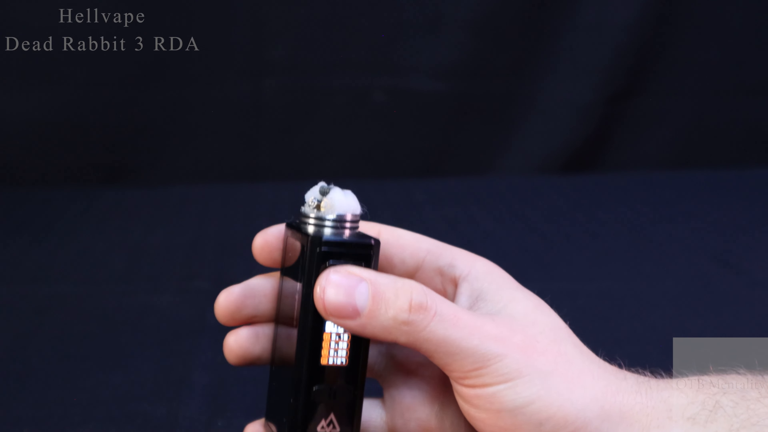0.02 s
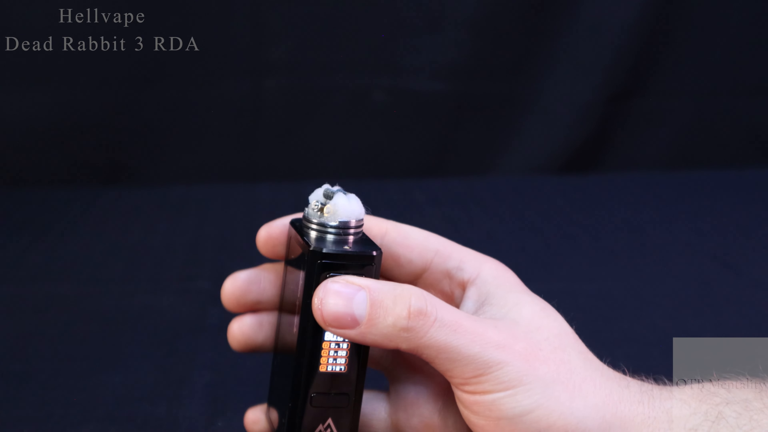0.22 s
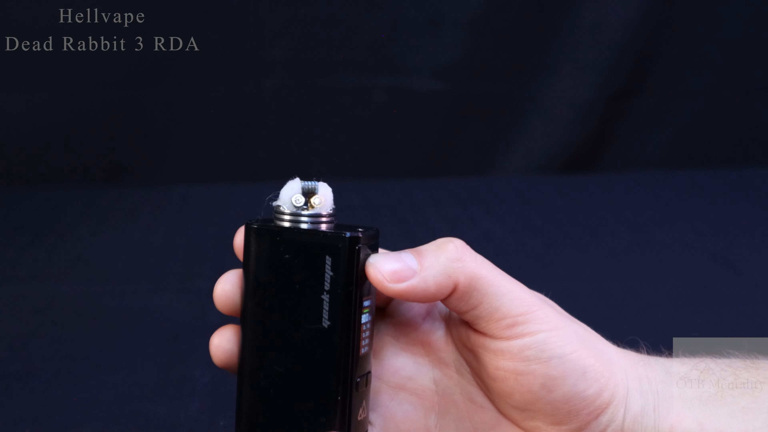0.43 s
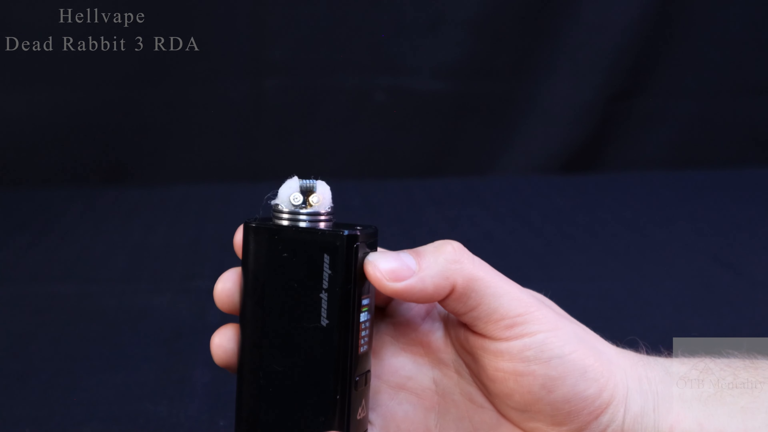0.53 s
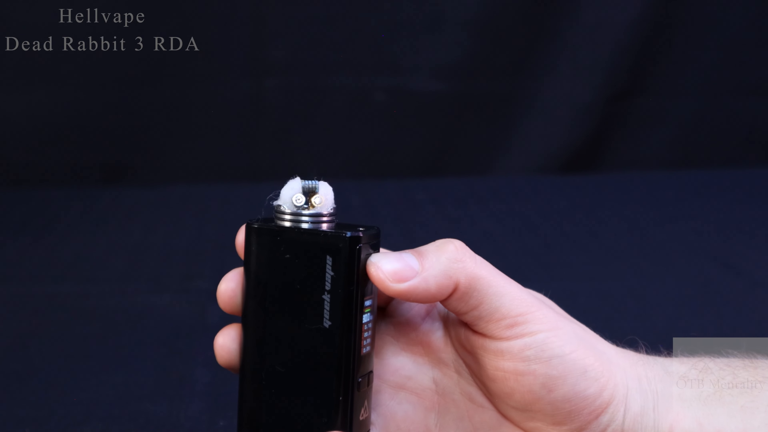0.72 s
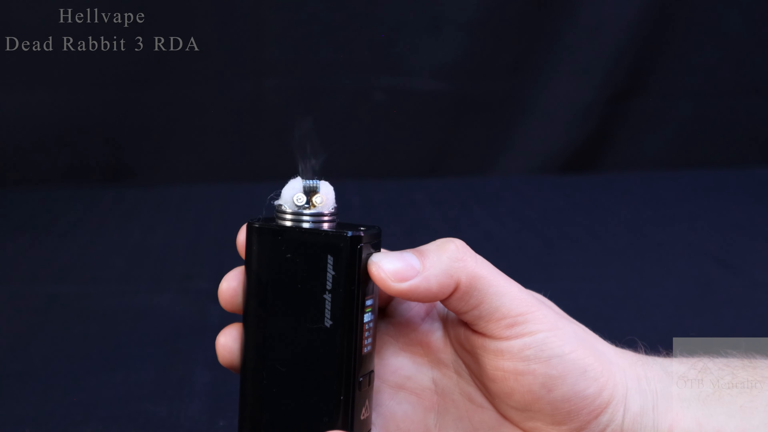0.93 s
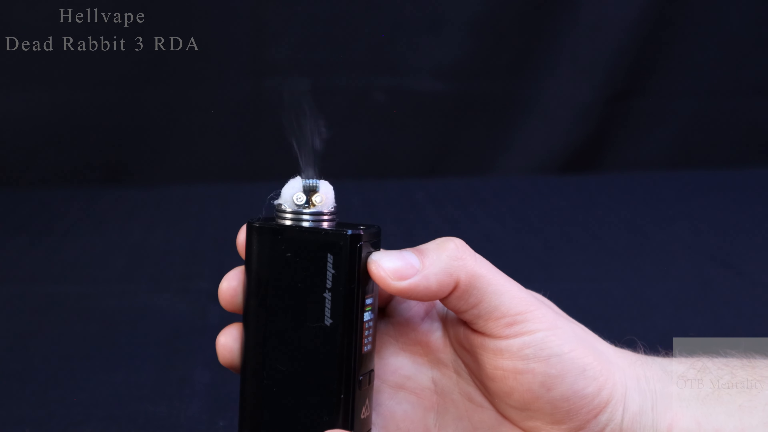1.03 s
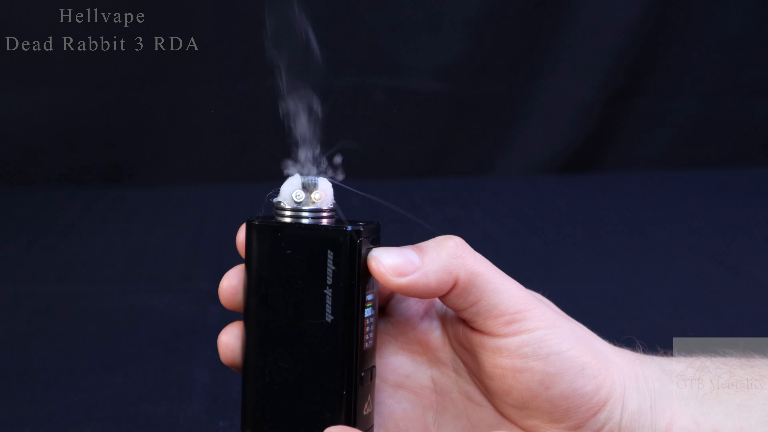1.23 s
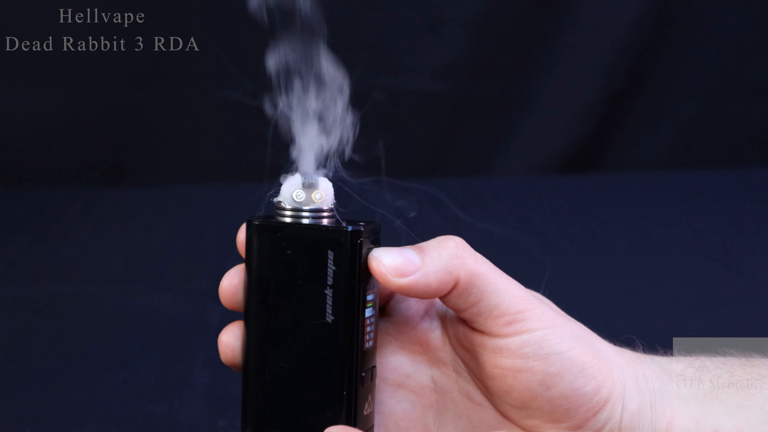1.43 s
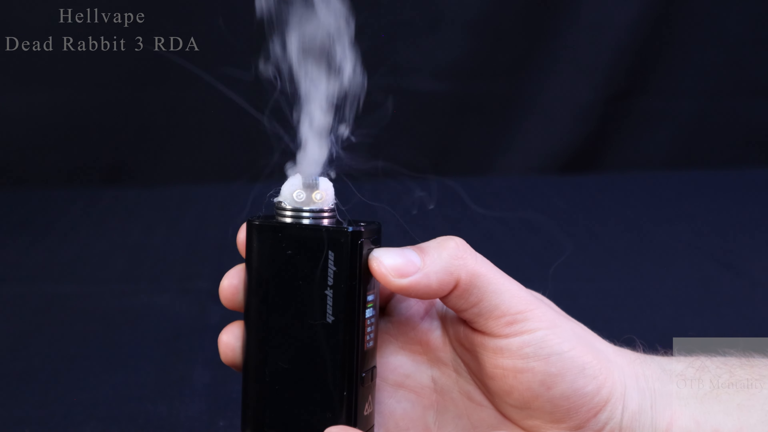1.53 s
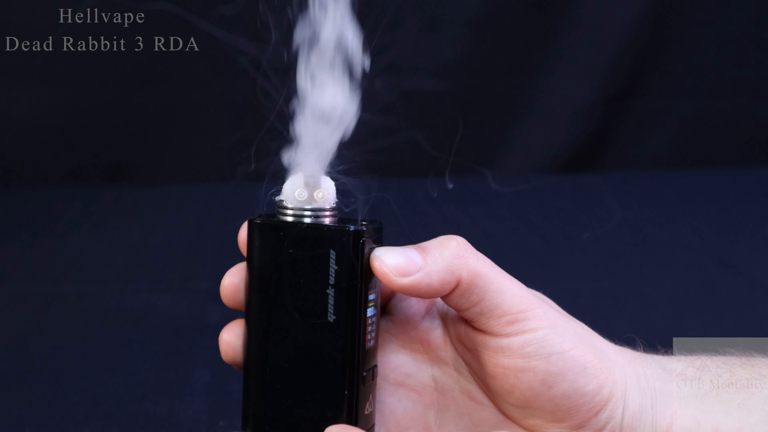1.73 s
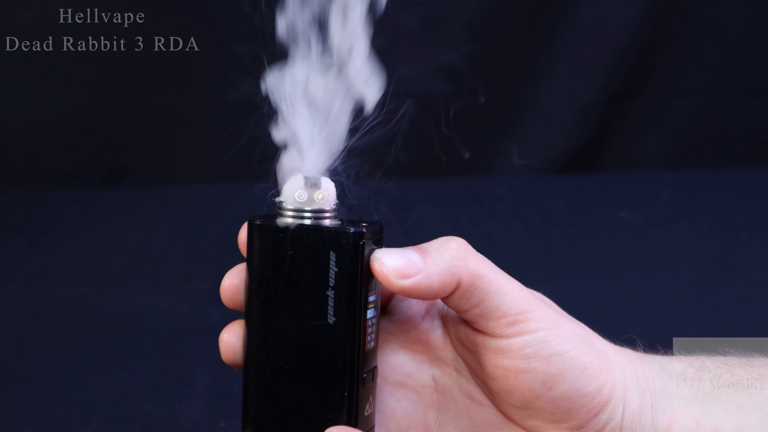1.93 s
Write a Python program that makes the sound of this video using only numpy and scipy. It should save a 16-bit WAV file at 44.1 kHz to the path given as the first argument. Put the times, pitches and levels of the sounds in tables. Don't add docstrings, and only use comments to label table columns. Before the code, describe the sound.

Wet coils in a vaping device begin to sizzle faintly after a soft button click, spit around the middle, then boil into a steady hiss; low handling bumps come first, close up in a quiet room.

```python
import sys
import numpy as np
from scipy import signal
from scipy.fft import rfft, irfft
from scipy.io import wavfile
from scipy.ndimage import uniform_filter1d

SR = 44100
rng = np.random.default_rng(int(sys.argv[2]) if len(sys.argv) > 2 else 0)


def volts_from_db(level):
    exponent = np.asarray(level, float) / 20
    return 10 ** exponent


def to_wav(sig):
    pcm = np.clip(np.atleast_2d(sig), -1, 1) * 32767
    pcm = np.round(pcm).astype(np.int16)
    wavfile.write(sys.argv[1], SR, pcm.T)


N = 88200
T = np.arange(N) / SR


def level(x, db):
    return x * volts_from_db(db) / np.sqrt(np.mean(x ** 2))


def curve(rows, before_db=-130):
    a = np.array(rows)
    return np.interp(T, a[:, 0], a[:, 1], left=before_db)


def ring(x, hz, width_hz):
    return signal.lfilter(*signal.iirpeak(hz, hz / width_hz, fs=SR), x)


def noise(points):
    a = np.array(points)
    f = np.fft.rfftfreq(N, 1 / SR) + 1
    colour_db = np.interp(np.log(f), np.log(a[:, 0]), a[:, 1])
    return level(irfft(rfft(rng.standard_normal(N)) * volts_from_db(colour_db), N), 0)


def walk(rate_per_s):
    k = int(SR / rate_per_s)
    return level(uniform_filter1d(uniform_filter1d(rng.standard_normal(N), k), k), 0)


# t/s, level/dB
SPIT_EVENTS = [(.9543, -52), (.9618, -52), (.9678, -52), (.981, -52), (.985, -53), (.9914, -52),
               (.9954, -49), (.9985, -49), (1.0125, -46), (1.0175, -50), (1.023, -51), (1.0257, -50),
               (1.032, -54), (1.0595, -53), (1.08, -53), (1.0875, -53), (1.2326, -52), (1.3174, -48)]
FULL_BOIL_DB = -54


def bubbles(heat_db):
    pops_per_s, spread_db = 2500, 5.5
    chance, sign, size = rng.random((3, N))
    pops = (chance < pops_per_s / SR) * np.sign(sign - .5) * volts_from_db(-spread_db * np.log(size + 1e-4))

    spitting = np.exp(-((T - 1.03) / .12) ** 2)
    pop_share = volts_from_db(-9 + 3 * spitting)
    drive = (rng.standard_normal(N) + level(pops, 0) * pop_share) / np.sqrt(1 + pop_share ** 2)
    for s, db in SPIT_EVENTS:
        i = int(s * SR)
        drive[i] -= volts_from_db(db - FULL_BOIL_DB - heat_db[i]) * 3
    return drive


# f/Hz, width/Hz, level/dB at full boil, growth/(dB per dB of boiling), wake t/s
DECK_MODES = [(442, 510, -15.5, 1.4, 1.37), (1240, 1140, -15.5, 3, 1.17), (2030, 1280, -7, 2, 1.28),
              (3794, 1100, -7.5, 2, 0.92), (5855, 1870, -6, 1.77, 0.89), (7880, 1500, -0.5, 1.7, 0.35),
              (9600, 2800, -3, 1.4, 0.41), (12470, 3000, -6, 1.12, 0.54), (14930, 7300, -7.5, 1, 0.75)]


def deck(drive, heat_db):
    wake_span_s, asleep_db = 0.079, -5
    flicker_db, flicker_per_s = .5, 22
    out = np.zeros(N)
    for k, (hz, width_hz, db, growth, wake_s) in enumerate(DECK_MODES):
        mode = level(ring(ring(drive, hz, width_hz), hz, width_hz), db)
        asleep = np.clip((wake_s - T) / wake_span_s, 0, 1)
        gain_db = growth * heat_db + flicker_db * walk(flicker_per_s) + asleep_db * asleep
        out += (-1) ** k * mode * volts_from_db(gain_db)
    return out


# t/s, level/dB
BOIL = [
    (0.49, -77),
    (0.544, -67),
    (0.85, -63),
    (1.018, -57.5),
    (1.04, -59),
    (1.452, -54),
    (1.994, -51.5),
    (2.0, -54.5),
]
# delay t/s, level/dB
SURFACES = [(.00603, -14), (.0031, -19), (.0107, -21.5), (0.0166, -17), (0.0228, -18.5), (.0331, -21),
            (.047, -17)]


def sizzle():
    heat_db = curve(BOIL) - FULL_BOIL_DB
    direct = deck(bubbles(heat_db), heat_db)
    out = direct.copy()
    for delay_s, db in SURFACES:
        out += volts_from_db(db) * np.roll(direct, int(delay_s * SR)) * (T > delay_s)
    return out * volts_from_db(FULL_BOIL_DB - 2.5)


# t/s, level/dB
GRIP_LEVEL = [(0, -51), (.04, -48), (.1, -52.5), (.26, -43.5), (.35, -47.5), (.385, -70), (.48, -57),
              (.52, -53.5), (.64, -70)]


def grip():
    fade_db = -280 * np.maximum(T - .64, 0)
    rumble = noise([(25, -14), (60, 3), (100, 5.5), (170, -7.5), (230, -29.5)])
    return rumble * volts_from_db(curve(GRIP_LEVEL) + fade_db)


# t/s, peak level/dB, f/Hz, rise/s, fall/s
BLOWS = [(0.045, -24.5, 75.2, 0.0064, .012), (0.068, -36.5, 37.7, 0.016, 0.069),
         (0.137, -45, 86, .01, 0.0079), (0.184, -21.5, 105.5, 0.0075, 0.006),
         (.2035, -10, 64, 0.0075, 0.024), (.285, -33.5, 88, 0.015, 0.012), (0.314, -38, 88.8, 0.016, 0.015),
         (0.481, -33, 84.5, 0.01, 0.0088), (.51, -45, 86, 0.028, 0.036), (.54, -47, 129.3, 0.0047, 0.043),
         (0.584, -58, 99, 0.0078, 0.0064)]


def thumps():
    hand_damps_s, damp_span_s, stand_top_hz = .266, 0.0089, 213
    out = np.zeros(N)
    for s, db, hz, rise_s, fall_s in BLOWS:
        u = np.maximum(T - s, 0)
        rise = np.sin(np.pi / 2 * np.minimum(u / rise_s, 1)) ** 2
        fall = np.exp(-np.maximum(u - rise_s, 0) / fall_s)
        stop = np.clip((hand_damps_s - T) / damp_span_s, 0, 1) if s < hand_damps_s else 1
        out -= volts_from_db(db) * rise * fall * stop * np.sin(2 * np.pi * hz * u)
    lowpass = signal.butter(6, stand_top_hz, fs=SR, output="sos")
    return signal.sosfiltfilt(lowpass, out + grip())


def creak():
    start_hz, glide_hz_per_s, span_s = 373, 3200, 0.012
    u = T - .226
    chirp = np.sin(2 * np.pi * u * (start_hz + glide_hz_per_s / 2 * u))
    rough = 1 + .8 * np.cos(2 * np.pi * 140 * T) + .5 * walk(60)
    return np.exp(-(u / span_s) ** 2) * chirp * rough * volts_from_db(-60)


# f/Hz, level/dB, t60/s
BUTTON_MODES = [(484, -12, 0.0057), (726, -8, 0.0089), (1010, -5.5, .025), (1326, -1, 0.015),
                (1860, -5, 0.011), (2270, -9, 0.018), (2620, -10, 0.013), (3400, -0.5, 0.0097),
                (3600, -11, 0.014), (4550, -17, 0.024), (5300, -17, .01), (6700, -17, 0.008),
                (8400, -16, .004)]


def button():
    click_s, click_db = .4745, -43.5
    echo_s, echo_db = 0.0068, -20
    tail_db, tail_t60_s = -57, .26
    click = np.zeros(N)
    for s, gain in ((click_s, 1), (click_s + echo_s, volts_from_db(echo_db))):
        u = np.maximum(T - s, 0)
        for hz, db, t60_s in BUTTON_MODES:
            click += gain * volts_from_db(db - 60 * u / t60_s) * np.sin(2 * np.pi * hz * u)

    u = np.maximum(T - click_s, 0)
    tail = noise([(200, -6), (900, -7.5), (2000, -10), (2900, -25), (3800, -11.5), (6000, -31)])
    tail *= (u > 0) * volts_from_db(tail_db - 60 * u / tail_t60_s)
    return click * volts_from_db(click_db) + tail


# t/s, level/dB
RUSTLE_LEVEL = [(0, -64.5), (.06, -67), (.125, -65), (.2, -68), (.27, -71), (.34, -75.5), (.42, -88)]
# f/Hz, level/dB
CLOTH_COLOUR = [(300, -3), (600, -8.5), (1100, -7.5), (2300, -7), (3200, -13), (4000, -12.5), (5500, -20),
                (12000, -24.5)]


def cloth():
    fade_db = -240 * np.maximum(T - .42, 0)
    rub = noise([(150, -31)] + list(CLOTH_COLOUR) + [(16000, -41)])
    return rub * volts_from_db(curve(RUSTLE_LEVEL) + fade_db + 2.0 * walk(40))


# t/s, level/dB
SWAY_LEVEL = [(0.4, -66), (0.452, -54), (0.746, -53), (0.908, -76), (1.076, -52), (1.224, -59.5),
              (1.366, -44.5), (1.834, -49), (2.0, -55.5)]


def sway():
    hz = 16.5 * (1 + .03 * walk(2.6))
    return np.sqrt(2) * np.sin(2 * np.pi * np.cumsum(hz) / SR) * volts_from_db(curve(SWAY_LEVEL, -54))


# f/Hz, level/dB
ROOM_COLOUR = [(12, -19), (22, -2), (45, -8.5), (90, -13.5), (150, -19), (240, -28), (1100, -38),
               (6000, -52.5)]


def room():
    swell_db = .8 * walk(8)
    tone = noise(list(ROOM_COLOUR) + [(9000, -68.5)]) * volts_from_db(-58 + swell_db)
    hiss = volts_from_db(-74) * rng.standard_normal(N)
    return tone + hiss


def scene():
    return (sizzle() + thumps() + creak() + button() + cloth() + sway() + room())[None]


def band_limit(x):
    return signal.sosfilt(signal.butter(12, 16320, fs=SR, output="sos"), x)


def record(dry):
    top_hz, slope_hz = 15770, 30
    f = np.fft.rfftfreq(N, 1 / SR)
    mix = irfft(rfft(dry) * np.clip((top_hz - f) / slope_hz, 0, 1), N)
    return band_limit(mix)


dry = scene()
out = record(dry)
to_wav(out)
```